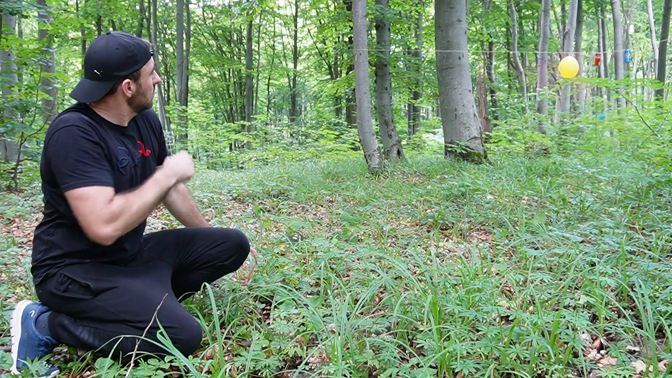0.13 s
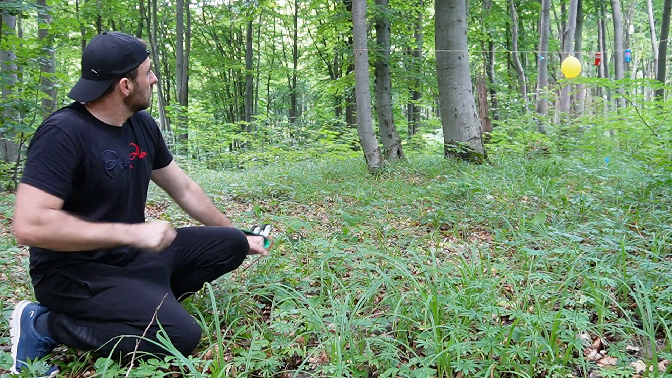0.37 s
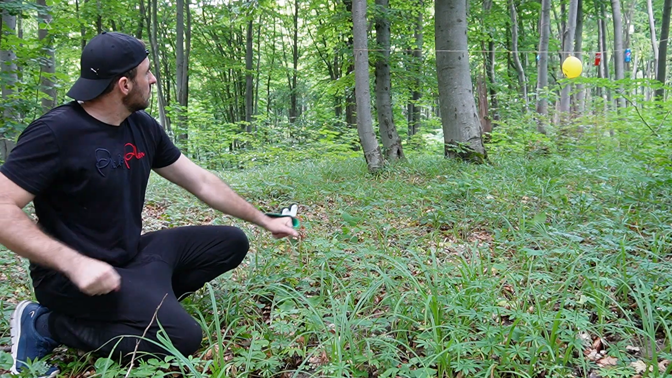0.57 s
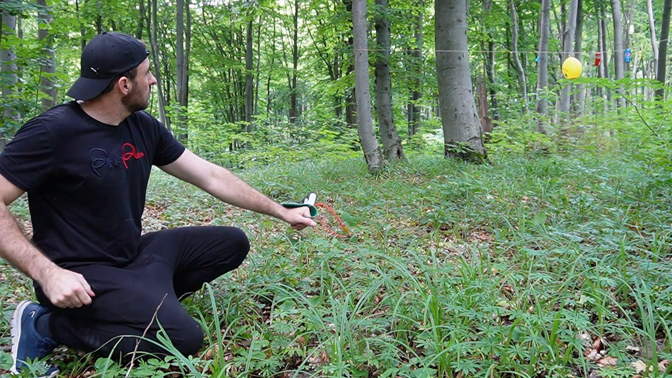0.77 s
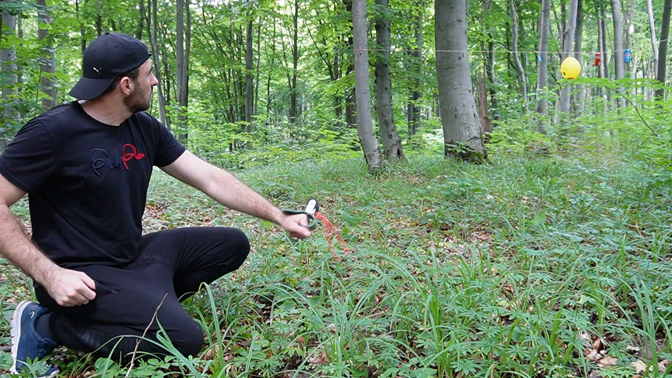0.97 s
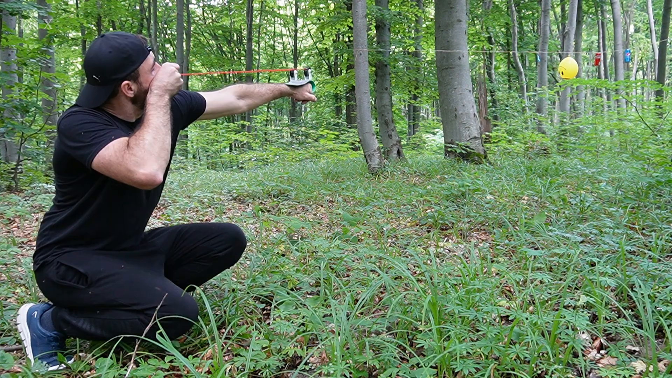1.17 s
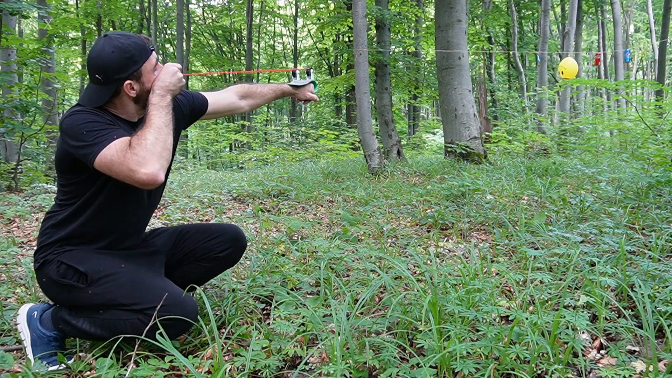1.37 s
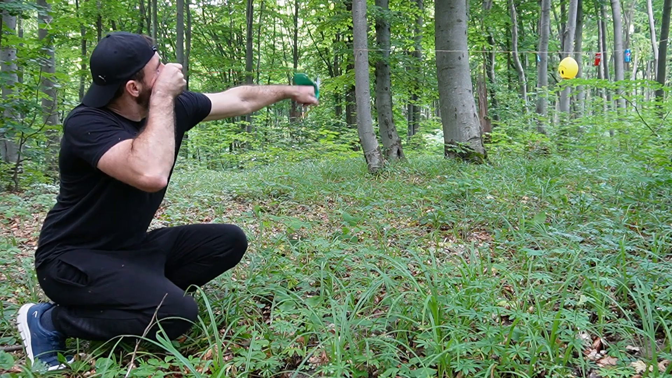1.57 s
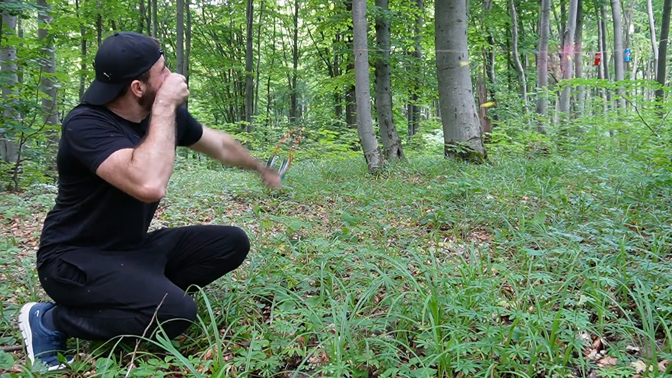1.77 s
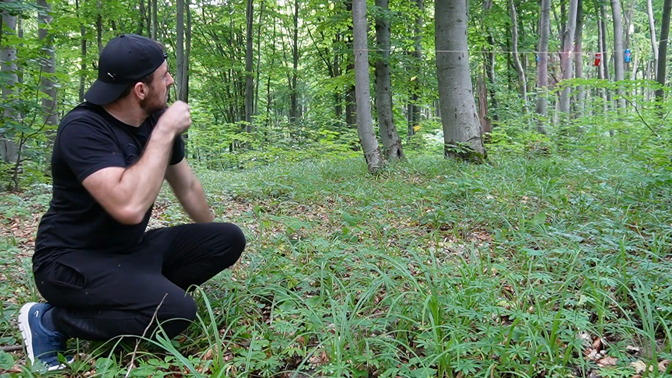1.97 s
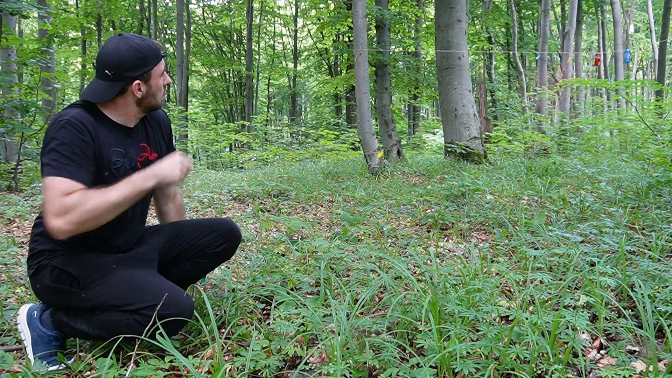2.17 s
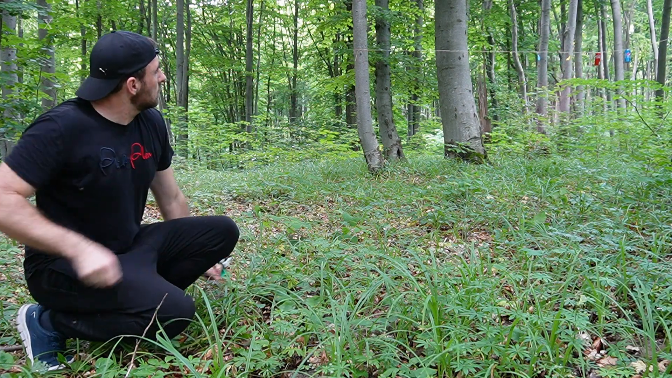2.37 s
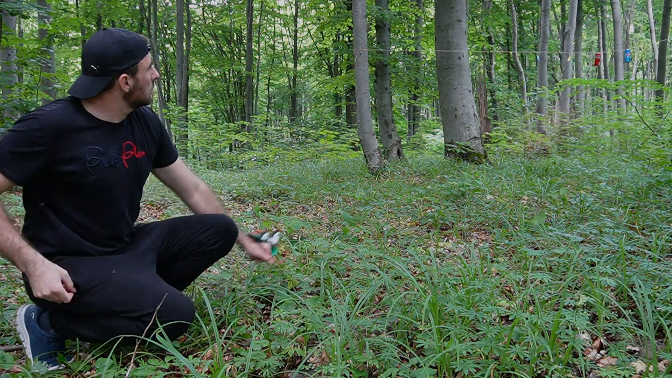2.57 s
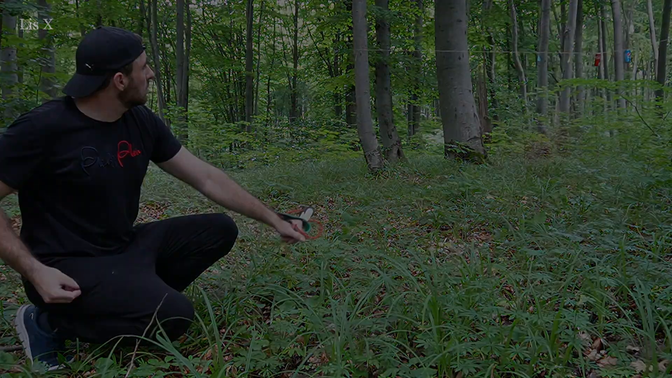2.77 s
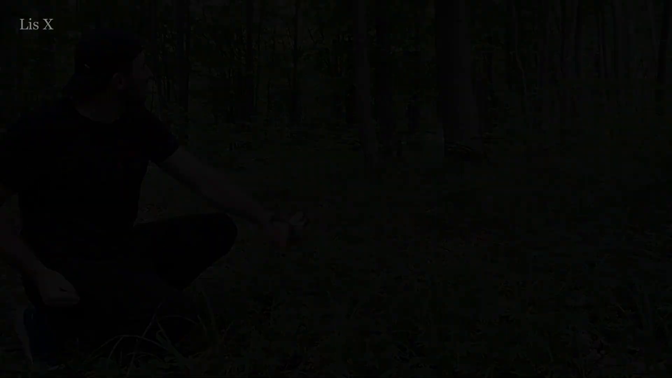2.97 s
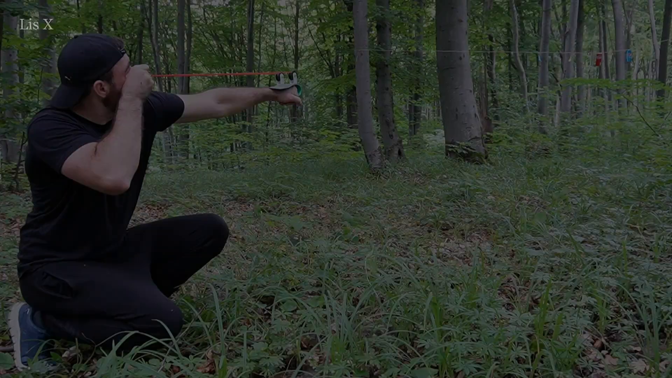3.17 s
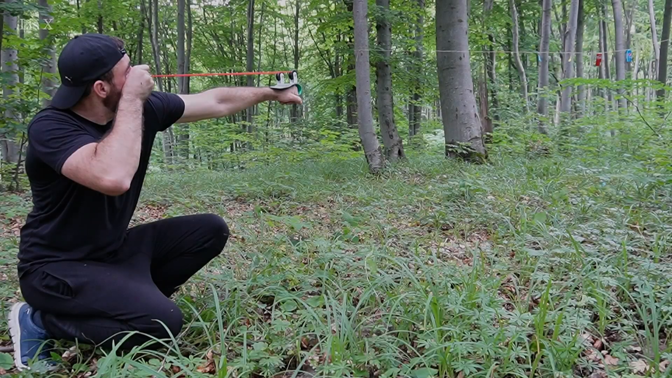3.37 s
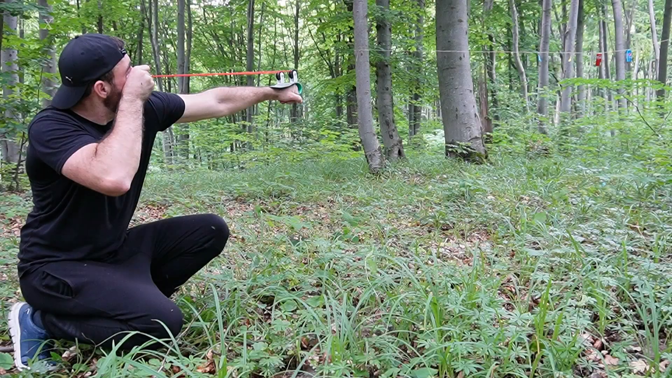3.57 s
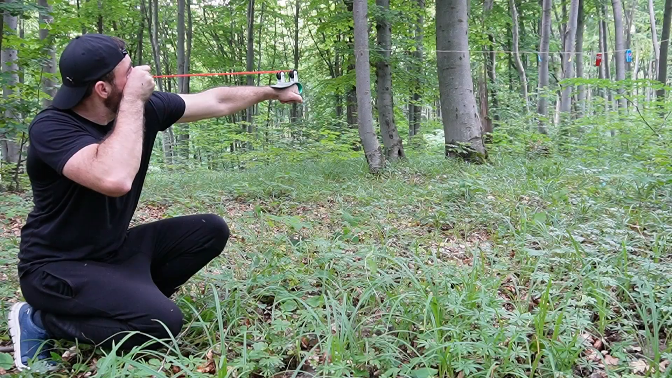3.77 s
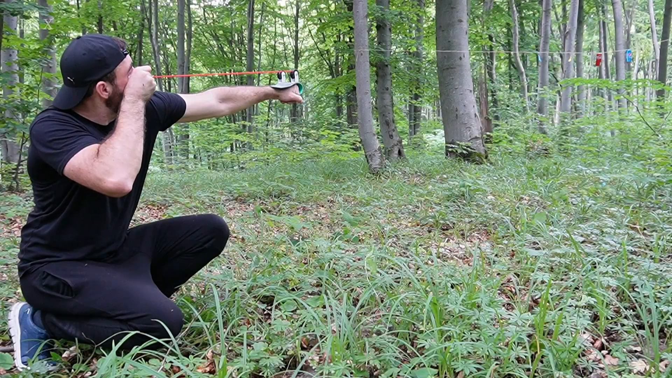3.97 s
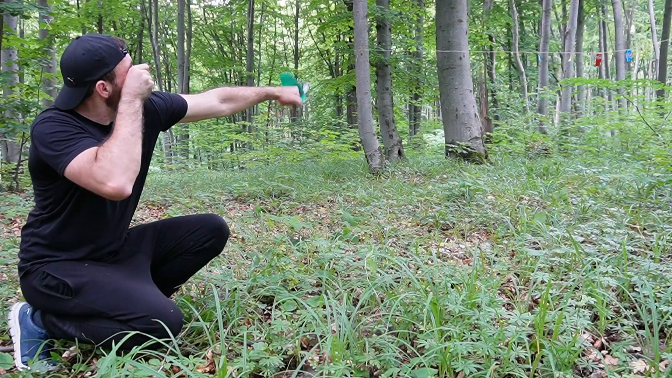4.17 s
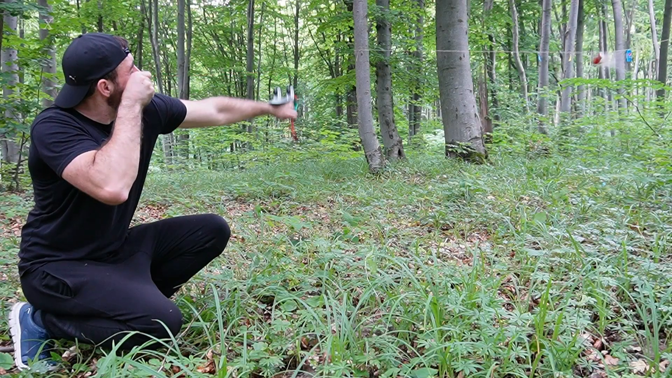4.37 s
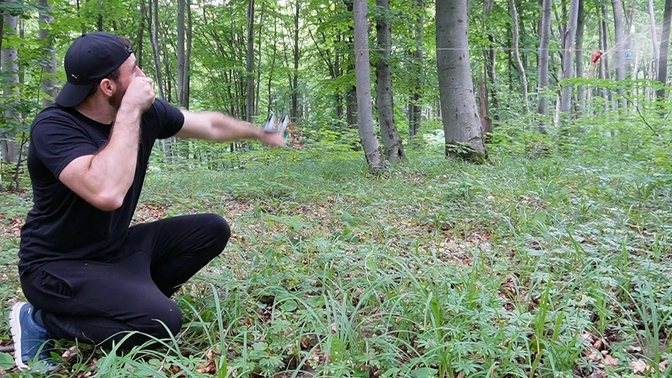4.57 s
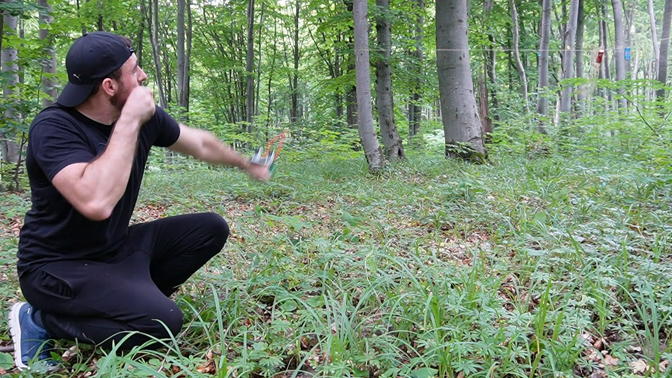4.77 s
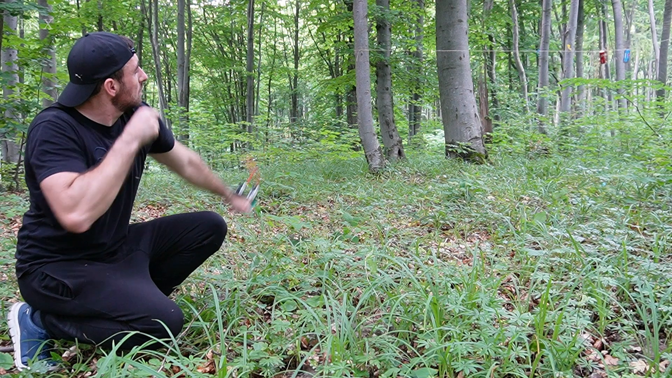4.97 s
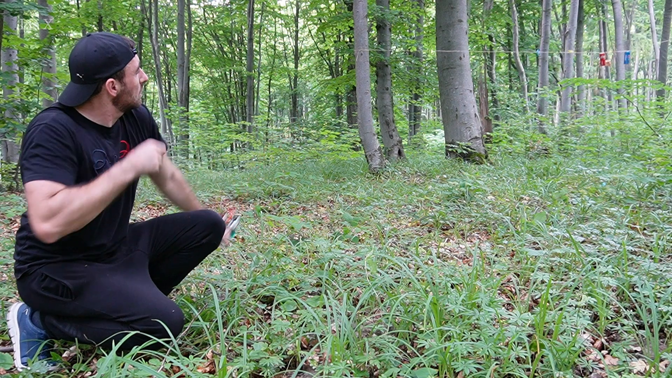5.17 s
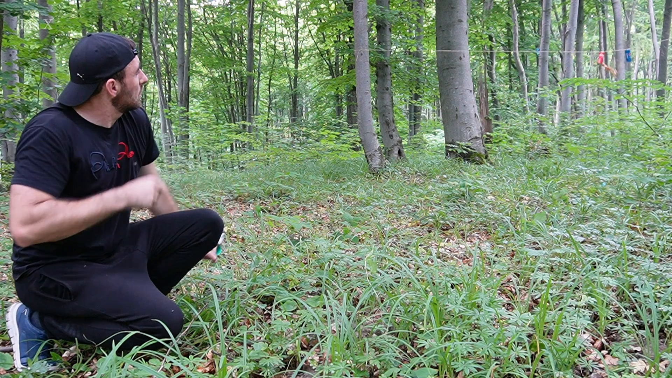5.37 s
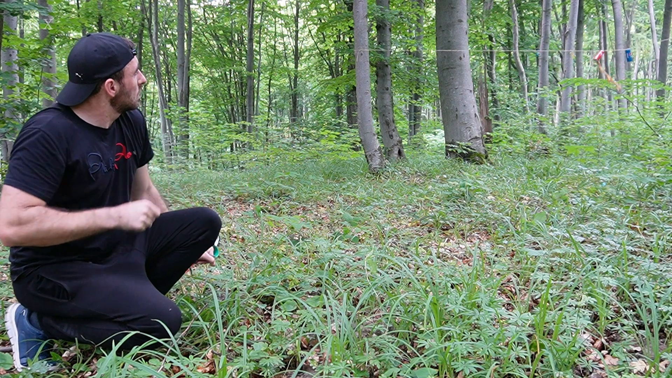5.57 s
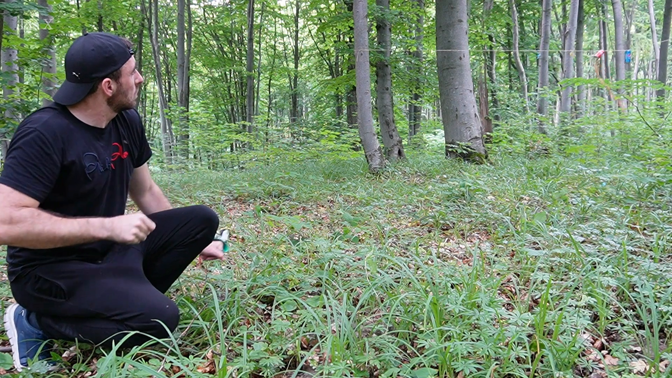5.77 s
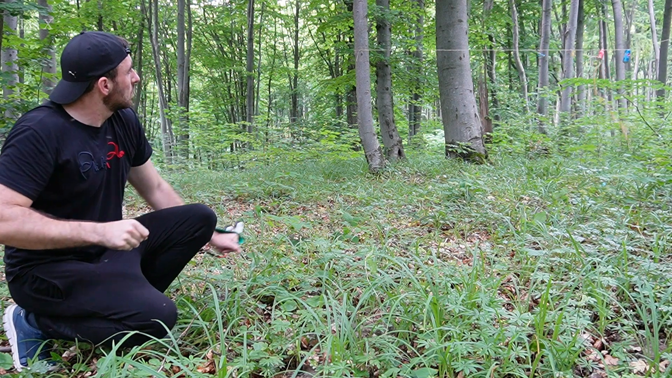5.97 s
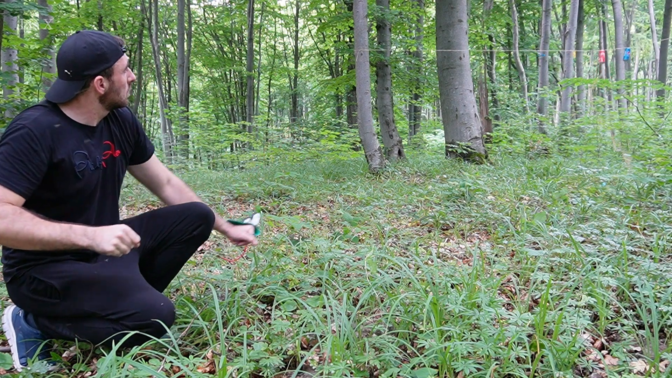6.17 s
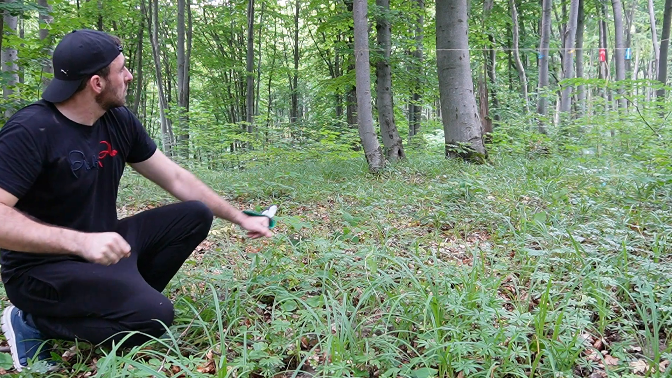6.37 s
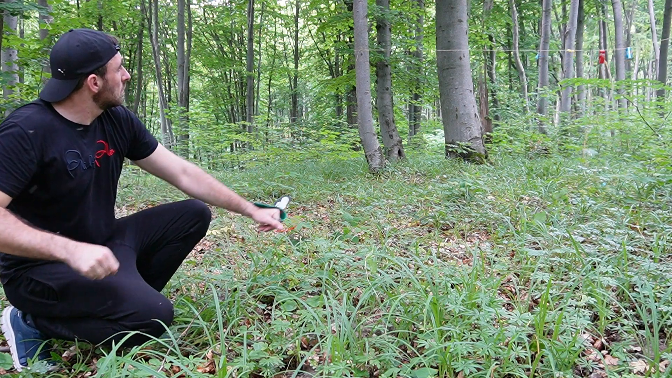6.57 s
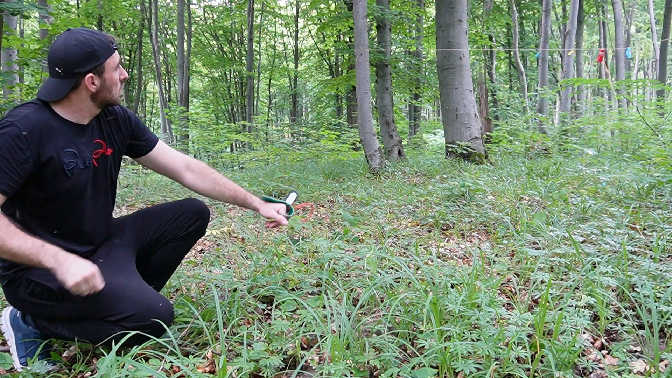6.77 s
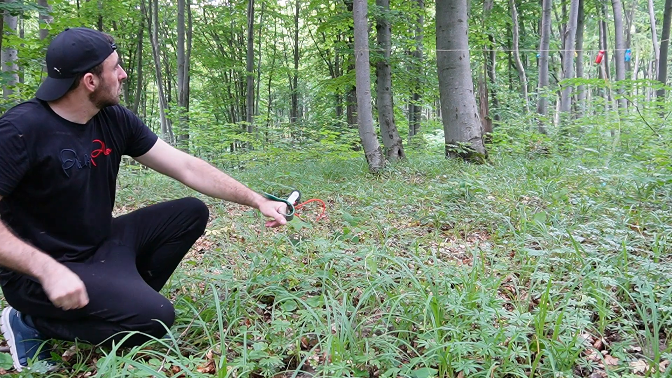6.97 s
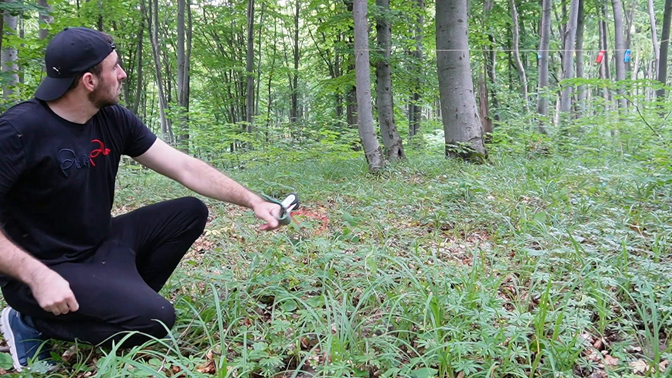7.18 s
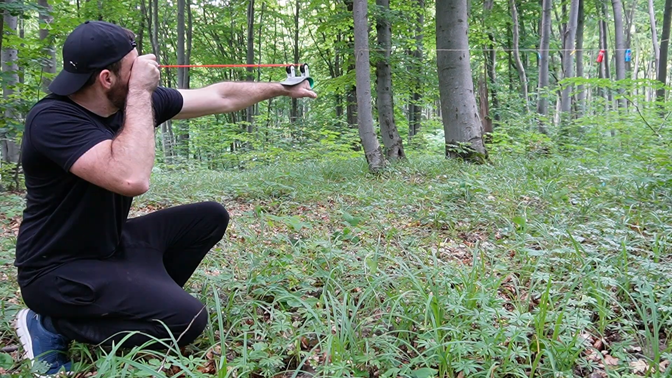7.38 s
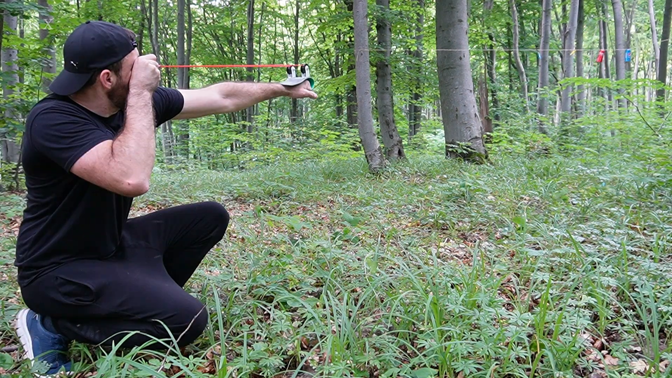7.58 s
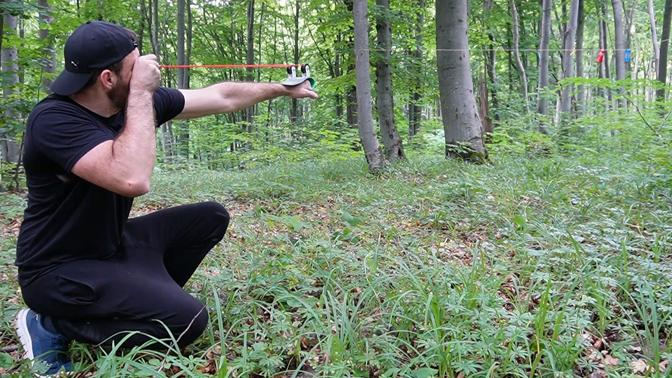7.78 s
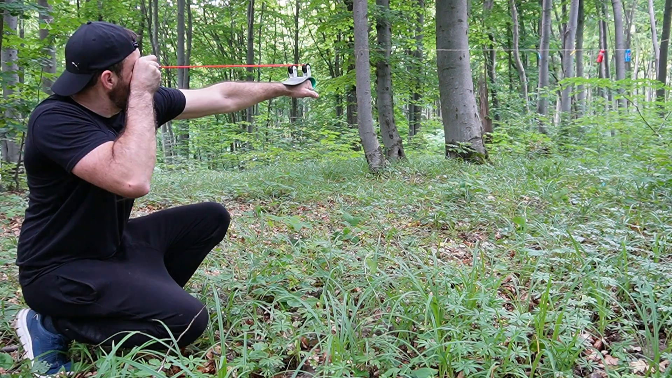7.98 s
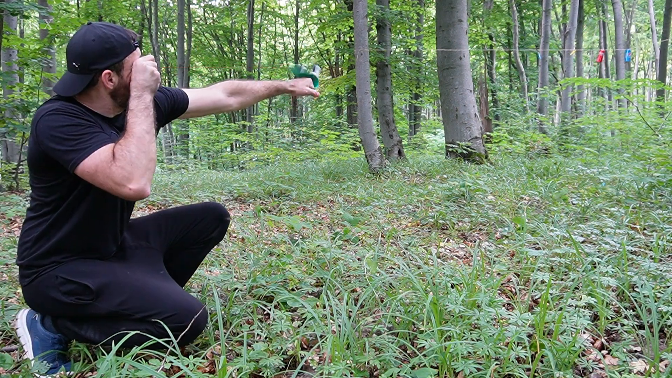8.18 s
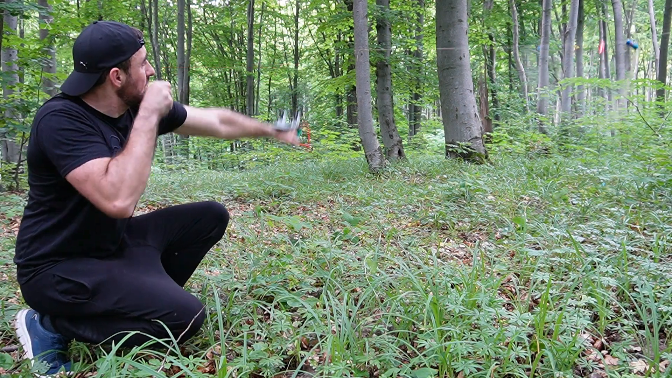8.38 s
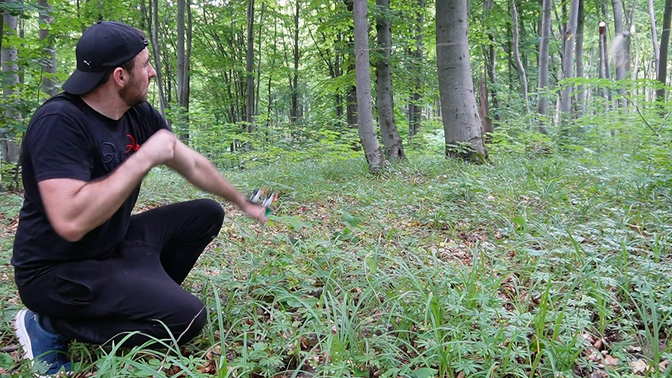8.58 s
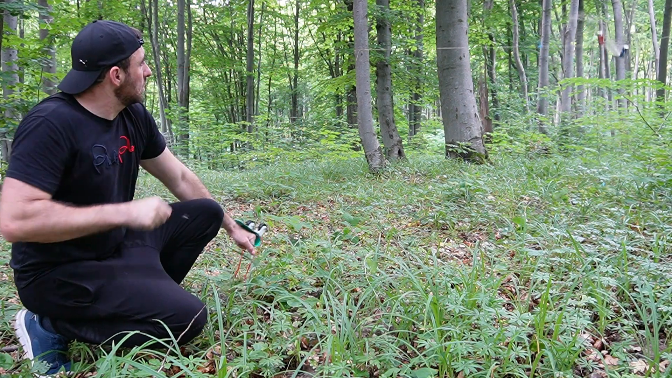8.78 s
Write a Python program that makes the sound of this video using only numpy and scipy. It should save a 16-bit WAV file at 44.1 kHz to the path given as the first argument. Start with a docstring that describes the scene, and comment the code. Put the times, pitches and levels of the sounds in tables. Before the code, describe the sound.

A fading forest echo with faint bird chirps opens the scene. A slingshot snaps close by, its rubber fluttering, and a balloon bursts with a sharp crack ringing among the trunks. After a brief fade, a half-speed shot sounds lower and stretched, with leaves rustling. Finally a normal-speed shot strikes a can with a bright metallic clank, echo and trilling birds. Close stereo microphone, very quiet air.

```python
"""A slingshot is fired at hanging targets in a beech forest, in four passages, the third at half speed.
Shaped noise bursts give the snap of pouch and bands; chopped noise and whistles give their flutter.
A balloon bursts or a can is struck: a crack of noise, with decaying sine modes for the can.
Noise decaying by frequency band is the long echo of the trunks. Gliding sines are birds; coloured
noise is leaves, sleeves, air and hiss; a faint low drone and, at half speed, a thin whine lie below."""
import sys
import numpy as np
from scipy import signal
from scipy.fft import rfft, irfft
from scipy.io import wavfile

SR = 44100
rng = np.random.default_rng(int(sys.argv[2]) if len(sys.argv) > 2 else 0)


def wav_out(sig):
    """Save sig, one row per channel (or a flat mono array), as 16-bit PCM at SR to the path in sys.argv[1]."""
    wavfile.write(sys.argv[1], SR, np.round(np.clip(np.atleast_2d(sig).T, -1, 1) * 32767).astype(np.int16))


N = 389844
TIME = np.arange(N) / SR

# Radiated spectra of the targets at normal speed: frequency_hz, density_db (per Hz)
BALLOON = [(40, -45.5), (140, -36.5), (280, -19.5), (560, -10.5), (900, -8.5), (1200, -2.5), (2200, 0),
           (4500, 0), (8000, -8), (12600, -20), (16000, -24.5)]
FIRST_TARGET = [(60, -38), (200, -35), (350, -21), (780, -8.5), (1050, -8.5), (1700, 3), (2600, -4),
                (4350, 0), (6400, -5.5), (10000, -15.5), (16000, -40)]
FILLED_BALLOON = [(60, -41), (220, -37), (400, -15), (1100, -5.5), (2200, 1), (4200, 3.5), (6000, -3),
                  (9000, -11), (12000, -21), (16000, -34.5), (20000, -51)]
CAN = [(60, -70), (300, -44), (600, -29), (1150, -10.5), (1700, -10), (2300, -1), (3400, 5), (5500, 0),
       (8000, -6), (12600, -17.5), (16000, -33)]
# Spectrum of cloth friction and rubber crackle at normal speed: frequency_hz, density_db (per Hz)
CLOTH = [(200, -53.5), (1200, -28), (4200, -2), (8000, -9.5), (12000, -22.5), (16000, -29)]


def shot(speed, snap_db, treble_db, rush_db, rush_s, rebound_s, rebound_db, pitch):
    """Released elastic energy: slip, swish, snap, rush, slack, rebound, whirr as (s after release, sound)."""
    rush_hz = 2900 * pitch
    # the pouch slips from the fingers just before the release, and the bands swish forward
    slip_lead_s = .0172
    slip = slap(speed, db=-39, decay_s=.0021, hz=1400, high_db=-11)
    swish = flutter(speed, slip_lead_s, -38, rush_hz, -13.5, pitch)
    swish = swish * np.linspace(0, 1, swish.shape[1])
    # the bands snap free and rush through the air, whistling
    snap = slap(speed, snap_db, .0035, 3300 * pitch, treble_db)
    rush = flutter(speed, rush_s, rush_db, rush_hz, -7, pitch,
                   depth=.41, bend=.1, breadth=.14, edge_s=.0015)
    # then they flap slack, quieter and lower
    slack_overlap_s = .008
    slack = flutter(speed, .04, rush_db - 7.5, 1502, -3.5, pitch, bend=.032)
    # they whip back once and go on whirring faintly
    rebound = flutter(speed, .016, rebound_db, 3200 * pitch, -.5, pitch)
    whirr = flutter(speed, .045, -43.5, 1815 * pitch, 2.5, pitch)
    return [(-slip_lead_s, slip), (-slip_lead_s, swish), (0, snap), (0, rush),
            (rush_s - slack_overlap_s, slack), (rebound_s, rebound), (rebound_s, whirr)]


def flutter(speed, seconds, db, whistle_hz, whistle_db, pitch, flap_hz=150, depth=.17, bend=.04,
            breadth=.082, crackle_db=-15, edge_s=.003):
    """Amplitude modulation and vortex shedding: flapping rubber chops the rush, crackles and whistles."""
    # spectrum of the rushing bands at normal speed and pitch factor 1: frequency_hz, density_db (per Hz)
    rubber_spectrum = [(100, -35), (300, -25), (600, -9.5), (1300, 0), (2500, 5.5), (3900, 5), (5500, -6.5),
                       (8000, -7), (12600, -21.5), (19000, -48)]
    t = clock(seconds, speed)
    wander = np.cumsum(rng.standard_normal((2, len(t))), axis=1)
    wander = (wander - wander.mean(axis=1, keepdims=True)) / wander.std(axis=1, keepdims=True)
    swing = np.sin(2 * np.pi * np.cumsum(flap_hz * (1 + .4 * wander[0])) * speed / SR)

    rush = grains(len(t), spread_db=4.5)[None] + .24 * diffuse(len(t), speed, spread_db=0)
    rush = colour(rush, rubber_spectrum, speed * pitch)
    crackle = grains(len(t), spread_db=6.5)[None] * np.maximum(swing, 0) ** 8  # once a flap
    crackle = colour(crackle, CLOTH, speed * pitch)

    # vortices come off irregularly, so the whistle is a narrow band of noise
    knots = np.arange(0, t[-1] + edge_s, 1 / (breadth * whistle_hz))
    amplitudes = rng.standard_normal(len(knots)) + 1j * rng.standard_normal(len(knots))
    vortices = np.interp(t, knots, amplitudes)
    cycles = np.cumsum(whistle_hz * (1 + bend * wander[1])) * speed / SR
    whistle = np.real(vortices * np.exp(2j * np.pi * cycles))
    whistle = whistle / whistle.std()

    edges = np.clip(np.minimum(t, t[-1] - t) / edge_s, 0, 1)
    mix = .99 * rush + undb(crackle_db) * crackle + undb(whistle_db) * whistle
    return undb(db) * edges * (1 + depth * swing) * mix


def slap(speed, db, decay_s, hz, high_db, low_db=-30):
    """Impact excitation: an exponentially decaying burst with one broad resonance."""
    shape = [(hz / 12, low_db), (hz / 3, -6), (hz, 0), (hz * 3, high_db), (hz * 8, high_db - 31)]
    return undb(db) * colour(burst(np.exp(-clock(.1, speed) / decay_s)), shape, speed)


def hit(speed, crack_db, hold_s, decay_s, near_db, delay_s, spread_s, far_db, ring_db, spectrum,
        ring_rise_s=.0006):
    """Impulse, scattering and modal decay: a crack, near trunks, the whole forest and a can's ring."""
    # modes of the can wall at normal speed: frequency_hz, level_db, t60_s
    can_modes = [(1232, -3, .7), (1275, 2, .25), (2270, 2.5, .3), (2772, -9.5, .9), (3240, -2.5, 0.79),
                 (3610, 13.5, 0.075), (4106, -2.5, .5), (4500, -6.5, 0.58), (5200, -8.5, .48),
                 (6265, -7, .34)]
    t = clock(2, speed)
    crack = undb(crack_db) * burst(np.exp(-np.maximum(t - hold_s, 0) / decay_s))
    clump = np.exp(-.5 * ((t - delay_s) / spread_s) ** 2)
    near = undb(near_db) * diffuse(len(t), speed, spread_db=5.5) * clump
    trunks = scatter(near + undb(far_db) * forest(speed), speed)
    ring = sum(undb(db) * np.sin(2 * np.pi * hz * t) * np.exp(-np.log(1000) * t / t60)
               for hz, db, t60 in can_modes)
    ring = undb(ring_db) * ring * (1 - np.exp(-t / ring_rise_s))
    return colour(crack + trunks, spectrum, speed) + ring


def scatter(x, speed, gain=.09, longest_s=.009, count=7):
    """Comb filtering: ground, body and stems close by return faint early copies of either sign."""
    lags = (rng.uniform(.0006, longest_s, count) * SR / speed).astype(int)
    copies = sum(rng.choice([-1, 1]) * np.pad(x, ((0, 0), (lag, 0)))[:, :x.shape[1]] for lag in lags)
    return (x + gain * copies) / np.sqrt(1 + count * gain ** 2)


def forest(speed, build_s=.016):
    """Reverberation by multiple scattering: trunk echoes build up, then each band decays at its own rate."""
    # reverberation time at normal speed: frequency_hz, t60_s
    forest_t60 = [(150, 1.3), (550, 1.13), (1200, 1.333), (2300, 1.304), (4500, 1.123), (8000, 0.89),
                  (13000, 0.63)]
    t = clock(2, speed)
    spectrum = rfft(diffuse(len(t), speed, spread_db=4))
    hz = np.fft.rfftfreq(len(t), 1 / SR) / speed
    centres, t60s = np.transpose(forest_t60)
    out = 0
    for share, t60 in zip(np.eye(len(centres)), t60s):
        band = irfft(spectrum * lookup(hz, np.c_[centres, share]), len(t))
        out = out + band * np.exp(-np.log(1000) * t / t60)
    return out * (1 - np.exp(-t / build_s))


def echo(x, speed):
    """Convolution with the forest's impulse response, scaled to unit energy."""
    response = forest(speed)
    response = response / np.linalg.norm(response[0])
    return signal.fftconvolve(x.mean(axis=0)[None], response, axes=1)[:, :N]


def brush(speed, db, rise_s, decay_s):
    """Friction noise: cloth dragging over cloth and leaves makes a short rush of fine grains."""
    t = clock(1, speed)
    friction = colour(diffuse(len(t), speed, spread_db=5.5), CLOTH, speed)
    return undb(db) * friction * np.minimum(t / rise_s, 1) * np.exp(-t / decay_s)


def bird_note(seconds, from_hz, to_hz, falling, waver=.0171, stray=.0308):
    """Frequency modulation: a wavering whistle (peak 2) glides for the share `falling`, then holds."""
    u = clock(seconds, 1) / seconds
    hz = np.interp(u, [0, falling], [from_hz, to_hz])
    wavering = waver * falling * np.interp(u, np.linspace(0, 1, 14), rng.standard_normal(14))
    # notes that fall for longer stray further in pitch
    hz *= 1 + wavering + stray * falling ** 3 * rng.standard_normal()
    return (2 * np.sin(np.pi * u) * np.sin(2 * np.pi * np.cumsum(hz) / SR))[None]


def bird_notes():
    """Gliding tones in sequence: calls, sweeps and a trill as (s, direct gain dB, echo gain dB, sound)."""
    # one bird's calls, a high and a lower note: start_s, high_hz, low_hz, direct_gain_db, echo_gain_db
    bird_calls = [(0.45, 4590, 4000, -54, -56), (.776, 5440, 3890, -61.5, -56.5)]
    # another bird's sinking, swelling trill: time_s, from_hz, to_hz, echo_gain_db
    trill = [(7.2, 6980, 4300, -58), (7.45, 5900, 2900, -60), (7.6, 4760, 3490, -53),
             (7.9, 4720, 3490, -51)]
    # its slower, deeper closing sweeps: start_s
    sweep_times = [7.903, 8.02, 8.125]
    notes = []
    call_note_s, call_step_s, fall_share, low_note_db = .041 / .76, .051, .43, -4
    for s, high_hz, low_hz, direct_db, echo_db in bird_calls:
        # each note starts this many times above its final pitch
        high = bird_note(call_note_s, high_hz * 1.37, high_hz, fall_share)
        low = bird_note(call_note_s, low_hz * 1.1, low_hz, fall_share)
        notes.append((s, direct_db, echo_db, high))
        notes.append((s + call_step_s, direct_db + low_note_db, echo_db + low_note_db, low))

    sweep_db, sweep_direct_db = -49, -8  # direct relative to echo
    for s in sweep_times:
        sweep = bird_note(.04 / .76, 5300, 2450, .92)
        notes.append((s, sweep_db + sweep_direct_db, sweep_db, sweep))

    trill_step_s, trill_direct_db = .047, -6.5
    times, *curves = np.transpose(trill)
    for s in np.arange(times[0], times[-1], trill_step_s):
        from_hz, to_hz, db = (np.interp(s, times, curve) for curve in curves)
        note = bird_note(.03 / .76, from_hz, to_hz, falling=.85, stray=.05)
        notes.append((s, db + trill_direct_db, db, note))
    return notes


def leaves():
    """Superposed small impacts: dense coloured noise rustles in a long, slightly uneven swell."""
    # spectrum as heard in the half-speed passage: frequency_hz, density_db (per Hz)
    leaf_spectrum = [(35, -57), (60, -54), (208, -36.5), (292, -8.5), (403, -5.5), (674, -6), (1340, 0.5),
                     (1920, 2), (4160, -12.5), (7100, -30.5), (8790, -32), (10000, -58), (13000, -71),
                     (22000, -120)]
    start_s, peak_s, peak_db, rise_db_per_s, fall_db_per_s = 4.48, 6.53, -45.5, 9, 7.5
    db = peak_db + np.minimum(rise_db_per_s * (TIME - peak_s), fall_db_per_s * (peak_s - TIME))
    knots = np.arange(0, N / SR, .03)
    flicker_db = 1.14 * np.interp(TIME, knots, rng.standard_normal(len(knots)))
    rustle = colour(diffuse(N, .49, spread_db=1), leaf_spectrum)
    return rustle * undb(db + flicker_db) * (TIME > start_s)


def drone(second_db=0, waver=.044, waver_s=.15):
    """Harmonic tone of two partials: faint, wavering and sinking, perhaps a far engine."""
    start_s, end_s, start_db, fade_db_per_s = 1.08, 2.9, -78.5, 6
    from_hz, to_hz, sink_s = 145, 106, 1.15
    t = np.maximum(TIME - start_s, 0)
    knots = np.arange(0, N / SR, waver_s)
    wavering = 1 + waver * np.interp(t, knots, rng.standard_normal(len(knots)))
    hz = np.interp(t, [0, sink_s], [from_hz, to_hz]) * wavering
    phase = 2 * np.pi * np.cumsum(hz) / SR
    tone = np.sin(phase) + undb(second_db) * np.sin(2 * phase)
    return undb(start_db - fade_db_per_s * t) * tone * (t > 0) * (TIME < end_s)


def undb(db):
    """Logarithmic level: decibels to amplitude gain."""
    return 10 ** (np.asarray(db) / 20)


def lookup(hz, points):
    """Logarithmic frequency scale: interpolate a (Hz, value) table along it."""
    f, value = np.transpose(points)
    return np.interp(np.log(np.maximum(hz, 1)), np.log(f), value)


def colour(x, points, speed=1, size=2048):
    """Minimum-phase filtering: a causal response from the folded cepstrum; white noise keeps its level."""
    hz = np.fft.rfftfreq(size, 1 / SR) / speed
    cepstrum = irfft(np.log(undb(lookup(hz, points))))
    cepstrum[1:size // 2] *= 2
    cepstrum[size // 2 + 1:] = 0
    response = irfft(np.exp(rfft(cepstrum)))
    response = response[None] / np.linalg.norm(response)
    return signal.fftconvolve(x, response, axes=1)[:, :x.shape[1]]


def lowpass(x, hz):
    """Elliptic filtering: a steep cut of the top."""
    return signal.sosfilt(signal.ellip(8, .2, 80, hz, fs=SR, output="sos"), x)


def highpass(x, hz, order):
    """Butterworth filtering: a gentle cut of the bass."""
    return signal.sosfilt(signal.butter(order, hz, "high", fs=SR, output="sos"), x)


def clock(seconds, speed):
    """Time scaling: source time at each sample of a stretch played at this speed."""
    return np.arange(int(seconds * SR / speed)) * speed / SR


def add(out, s, x):
    """Superposition: mix x into out from time s."""
    i = int(s * SR)
    a, b = max(i, 0), min(i + x.shape[1], N)
    if b > a:
        out[:, a:b] += x[:, a - i:b - i]


def grains(n, spread_db):
    """Impulsive noise: dense tiny impulses of uneven size, rms 1."""
    x = rng.standard_normal(n) * undb(spread_db * rng.standard_normal(n))
    return x / x.std()


def diffuse(n, speed, spread_db):
    """Diffuse-field coherence: two close microphones agree in the bass and part in the treble."""
    # stereo width at normal speed: frequency_hz, side_minus_mid_db
    width = [(100, -27), (500, -18), (1200, -9.5), (2500, -11.5), (4500, -7), (8000, -4), (14000, -1)]
    hz = np.fft.rfftfreq(n, 1 / SR) / speed
    side = irfft(rfft(grains(n, spread_db)) * undb(lookup(hz, width)), n)
    return grains(n, spread_db) + side * np.array([[1], [-1]])


def burst(envelope):
    """Flat-spectrum impulse: a short pressure burst with random phases under the given envelope."""
    x = rng.standard_normal(len(envelope)) * envelope
    even = irfft(np.exp(1j * np.angle(rfft(x))), len(x)) * np.sqrt(envelope)
    return even[None] * np.linalg.norm(envelope) / np.linalg.norm(even)


def take(start, end, fade_in, fade_out, speed, air_db, air_cut_hz, hiss_db, low_cut_hz,
         near_echo_db=-15, whine_db=-84):
    """Superposition and time scaling: one passage; slow motion lowers and stretches its source sounds."""
    # In these tables start_s and release_s are heard times; durations and frequencies are at normal speed.
    # target hits: start_s, crack_db, hold_s, decay_s, near_trunks_db, near_delay_s, near_spread_s,
    # far_trunks_db, can_ring_db, spectrum
    hits = [(-.3, -12, .004, .002, -20, .045, .02, -16, -90, FIRST_TARGET),
            (1.7468, -9, 0.0032, 0.0011, -18.5, .044, 0.018, -16.5, -84, BALLOON),
            (4.5158, -12, 0.0014, 0.014, -14.5, 0.03, 0.0085, -23, -97, FILLED_BALLOON),
            (8.3605, -11.5, 0.003, 0.011, -20.5, 0.028, 0.038, -20.5, -29.5, CAN)]
    # pouch and rubber slaps, small ticks of the gear: start_s, level_db, decay_s, centre_hz,
    # high_db (at three times the centre)
    slaps = [(.911, -44.5, 0.0013, 5500, -28), (1.6615, -13.5, .0008, 2238, -12.5),
             (1.677, -20.5, .001, 5000, -17), (1.6812, -18, .0014, 3800, -10),
             (1.702, -23, 0.0026, 3790, -27.5), (2.8225, -44.5, .001, 4500, -26),
             (4.184, -16, 0.0032, 3200, -16.5), (4.252, -23, 0.0014, 7060, -37.5),
             (4.3003, -11.5, 0.0015, 2180, -12.5), (4.3292, -12.5, 0.00087, 2530, -11.5),
             (4.454, -23.5, 0.0018, 2330, -36), (4.788, -18, 0.0011, 2230, -30),
             (5.0645, -24, 0.0018, 2630, -11), (6.286, -36.5, .0017, 2714, -28),
             (8.2695, -11.5, 0.0017, 6850, -40), (8.282, -30, .0022, 4200, -32)]
    # shots: release_s, snap_db, snap_treble_db, rush_db, rush_s, rebound_after_s, rebound_db, pitch_factor
    shots = [(1.6175, -18, -10, -26.5, 0.044, 0.078, -33, 1.07),
             (4.1755, -24, -24, -23.5, 0.058, 0.13, -35.5, 0.84),
             (8.2185, -14, -13, -23.5, .04, .085, -30, 1.14)]
    # sleeves and undergrowth brushing: start_s, level_db, rise_s, decay_s
    brushes = [(.908, -60, .004, 0.55), (2.575, -59.5, 0.0043, 0.016), (2.82, -60, 0.041, 0.13),
               (8.747, -31.5, 0.0038, 0.046)]
    # spectra of forest air and hiss at normal speed: frequency_hz, density_db (per Hz)
    air_spectrum = [(30, -2.5), (120, -10), (300, -3.5), (560, -0.5), (900, 6), (1300, 2.5), (2200, -2.5),
                    (4500, -9.5), (8000, -17.5), (14000, -23), (19000, -31)]
    hiss_spectrum = [(500, -7), (2500, 5), (8000, -4.5), (16000, -9), (20000, -6)]

    def inside(table):
        """Time gating: the events that start within the passage."""
        return [row for row in table if start <= row[0] < end]

    near, far, song = np.zeros((3, 2, N))
    for s, *row in inside(hits):
        add(far, s, hit(speed, *row))
    for s, *row in inside(slaps):
        add(near, s, slap(speed, *row))
    for s, *row in inside(shots):
        for after_s, sound in shot(speed, *row):
            add(near, s + after_s / speed, sound)
    for s, *row in inside(brushes):
        add(near, s, brush(speed, *row))
    # the birds are far off, so much of their song arrives as echo, also from notes just before the passage
    for s, direct_db, echo_db, note in bird_notes():
        if speed == 1 and start - .2 <= s < end:
            add(far, s, undb(direct_db) * note)
            add(song, s, undb(echo_db) * note)

    air = colour(diffuse(N, speed, spread_db=3.5), air_spectrum, speed)
    air = undb(air_db) * highpass(air, air_cut_hz, order=1)
    hiss = undb(hiss_db) * colour(diffuse(N, speed, spread_db=-3), hiss_spectrum, speed)
    out = far + near + echo(undb(near_echo_db) * near + song, speed) + air + hiss
    # the microphone rounds only the very loudest peaks, and sheds bass
    out = highpass(out / (1 + out ** 8) ** (1 / 8), low_cut_hz, order=1)
    if speed < 1:
        # slowed down, a thin whine of the camera is heard, and the top is cut in proportion to the speed
        whine = undb(whine_db) * np.sin(2 * np.pi * 8700 * TIME)
        out = lowpass(out + leaves() + whine, 20000 * speed)
    rising = np.clip((TIME - start) / fade_in, 0, 1)
    falling = np.clip((end - TIME) / fade_out, 0, 1)
    return out * rising * falling


def scene():
    """Superposition: four passages one after another, with the drone."""
    # passages: start_s, end_s, fade_in_s, fade_out_s, playback_speed
    passages = [(-1, 1.078, .003, .003, 1), (1.078, 3.05, .003, .25, 1), (3.05, 7.325, .42, .006, .5),
                (7.35, 9, .004, .003, 1)]
    # background of each passage: air_db, air_low_cut_hz, hiss_db, microphone_low_cut_hz
    settings = [(-57.5, 2300, -93, 99), (-63.5, 45, -80.5, 40), (-63, 30, -83, 200),
                (-60.5, 1720, -75.5, 244)]
    return sum(take(*passage, *setting) for passage, setting in zip(passages, settings)) + drone()


def record(dry):
    """Band limiting: the camera cuts the top above 15.6 kHz."""
    return lowpass(dry, 15600)


dry = scene()
out = record(dry)
wav_out(out)
```